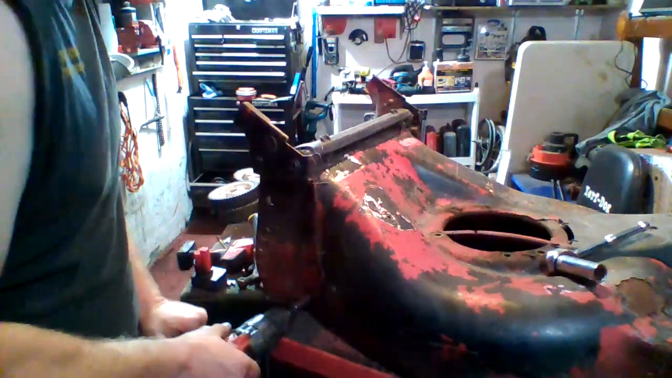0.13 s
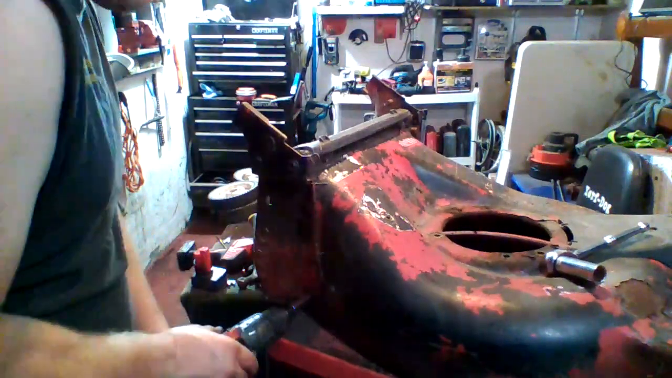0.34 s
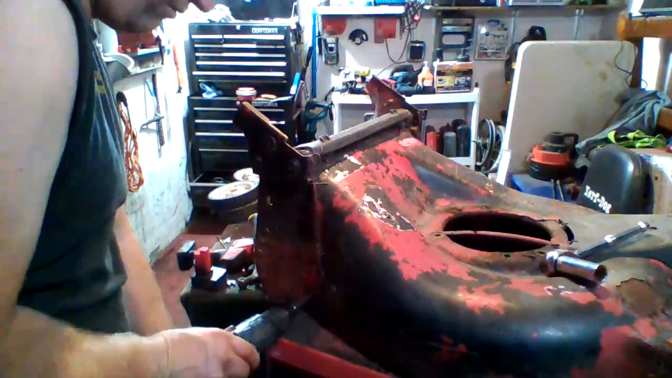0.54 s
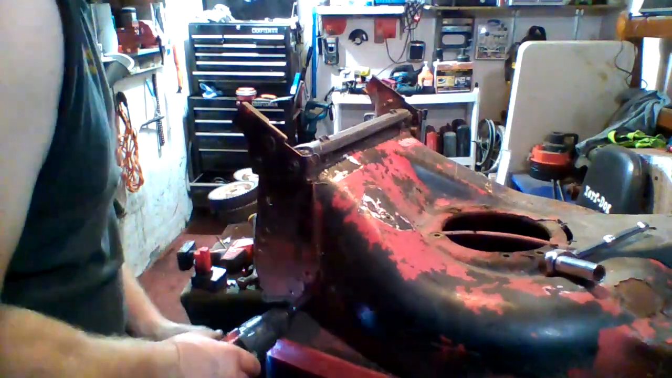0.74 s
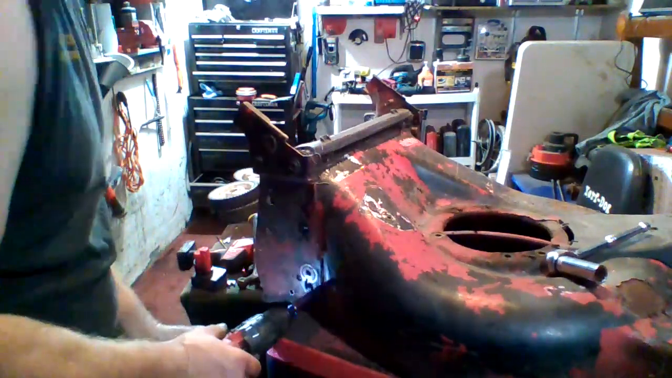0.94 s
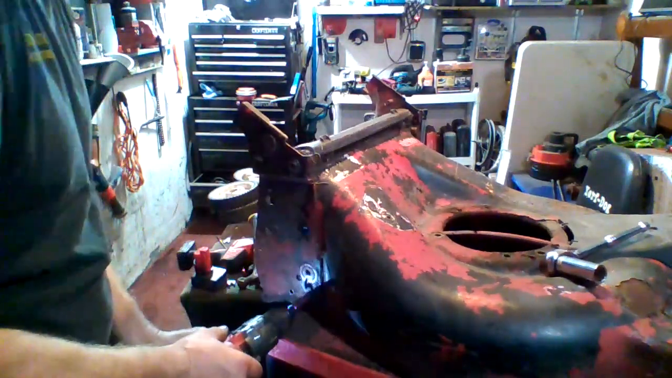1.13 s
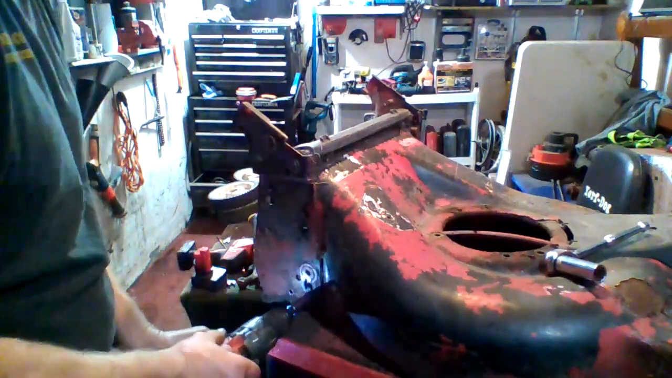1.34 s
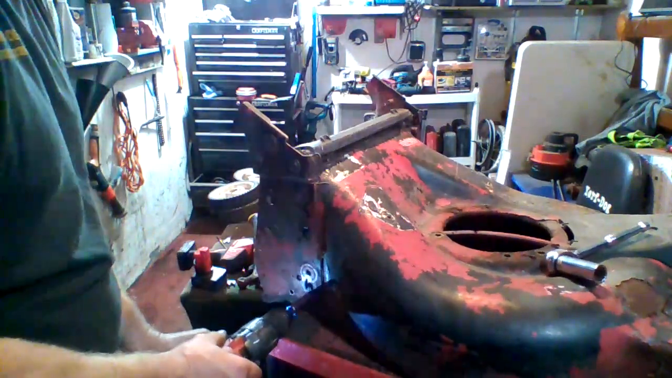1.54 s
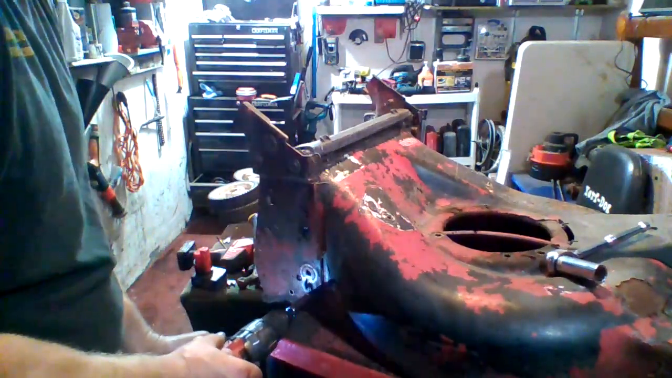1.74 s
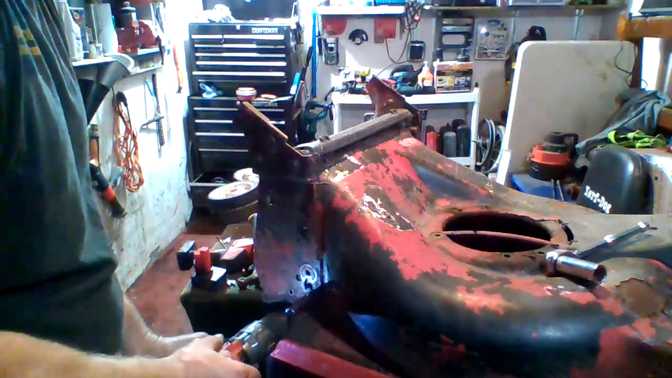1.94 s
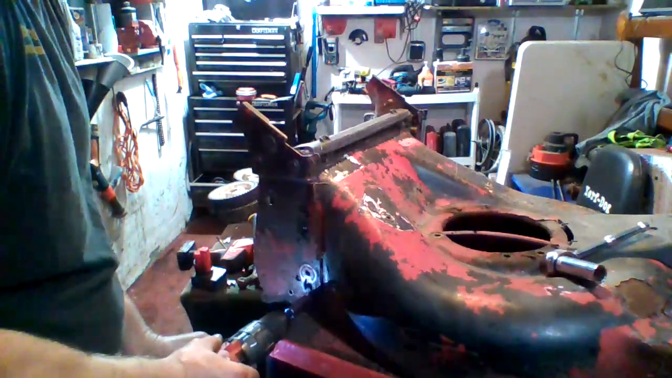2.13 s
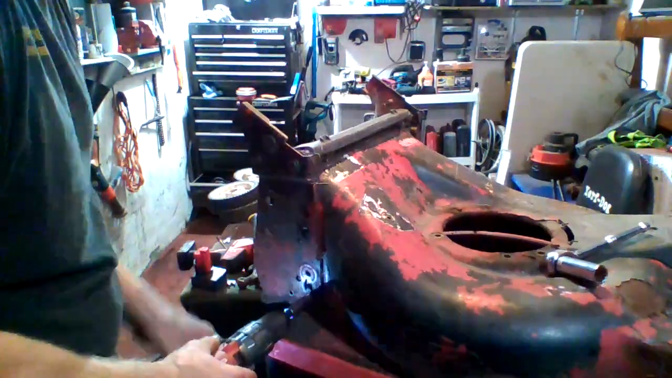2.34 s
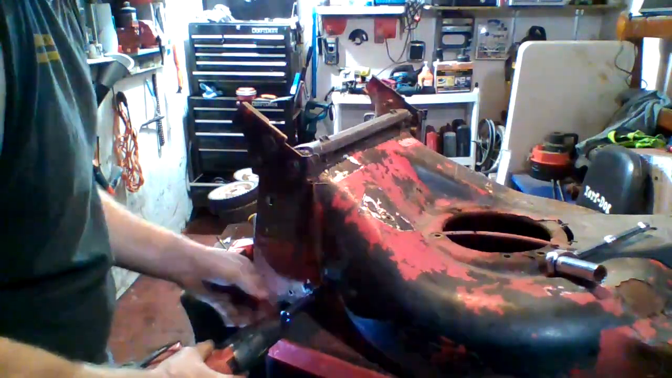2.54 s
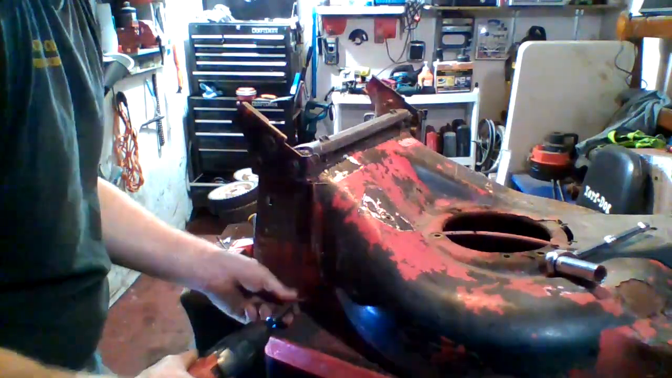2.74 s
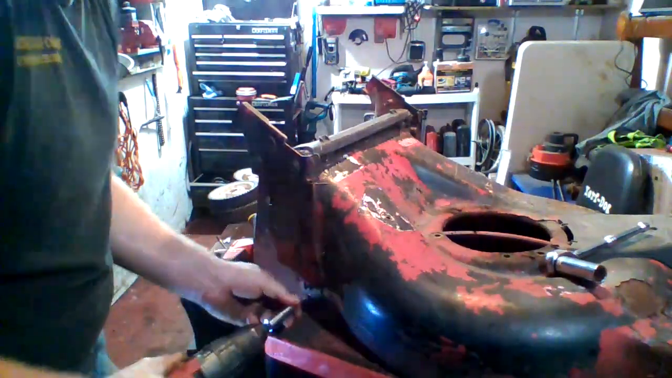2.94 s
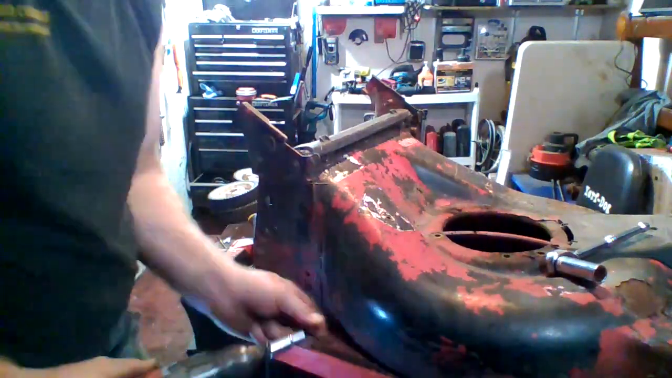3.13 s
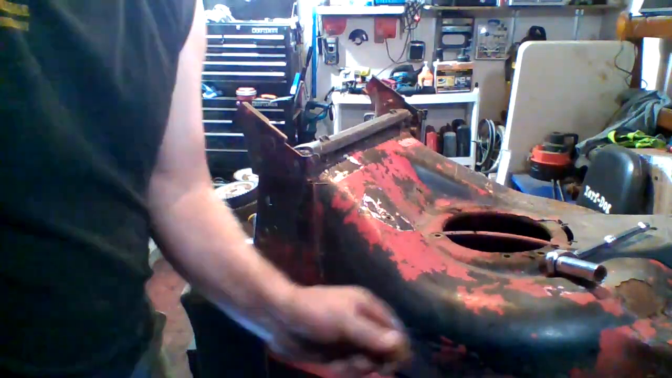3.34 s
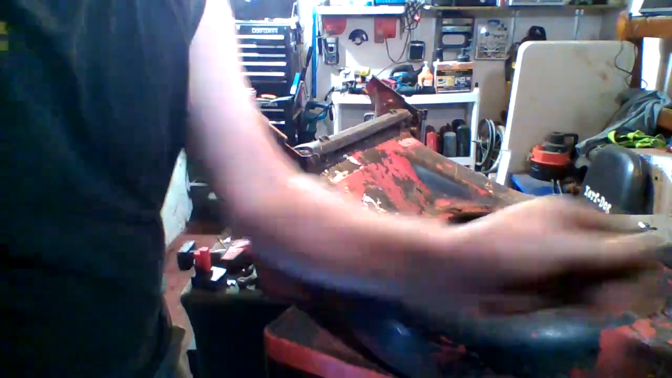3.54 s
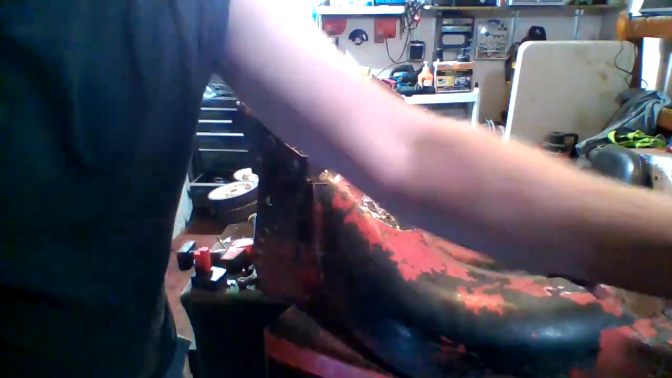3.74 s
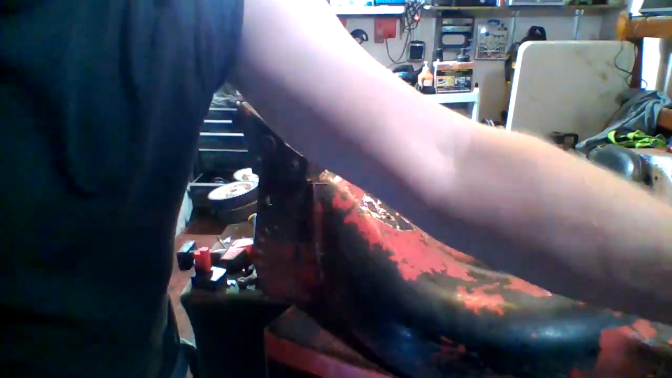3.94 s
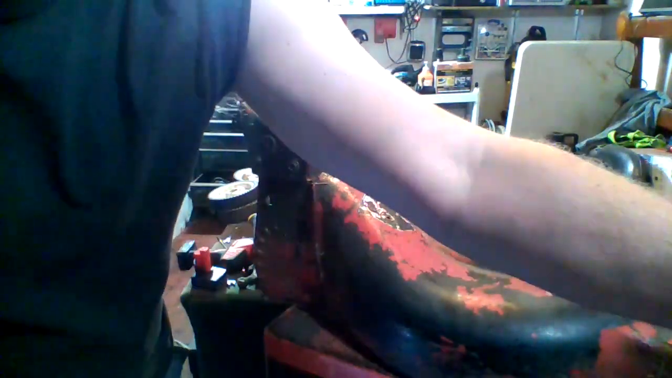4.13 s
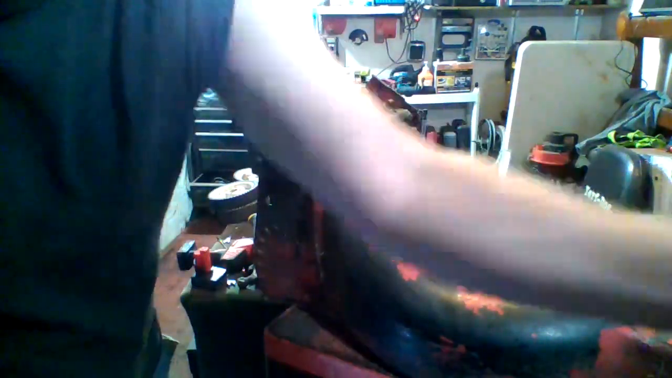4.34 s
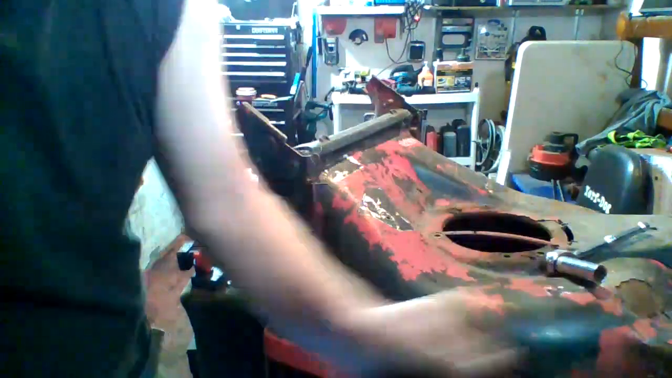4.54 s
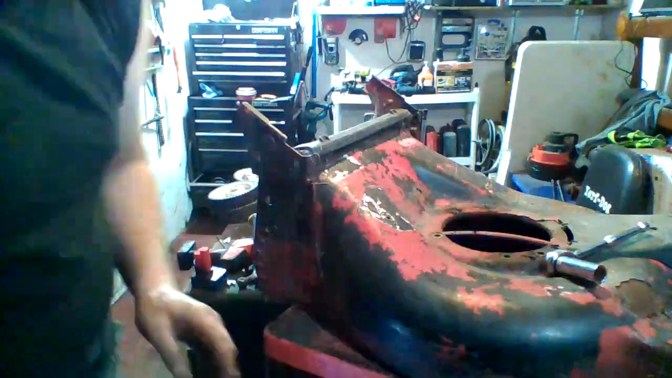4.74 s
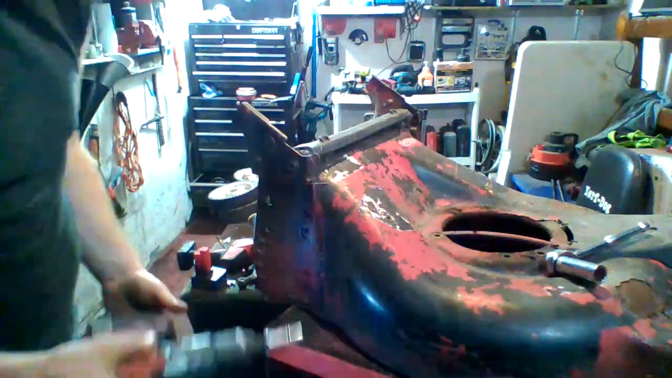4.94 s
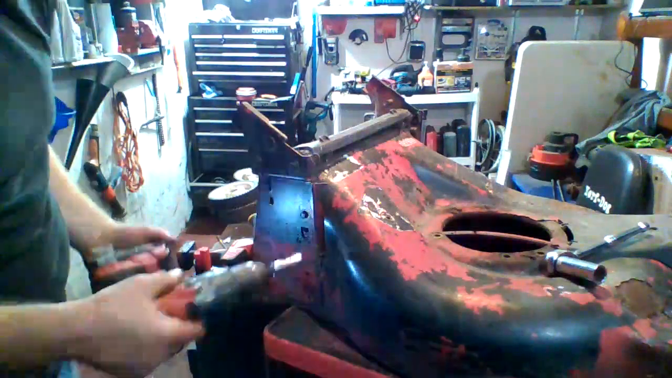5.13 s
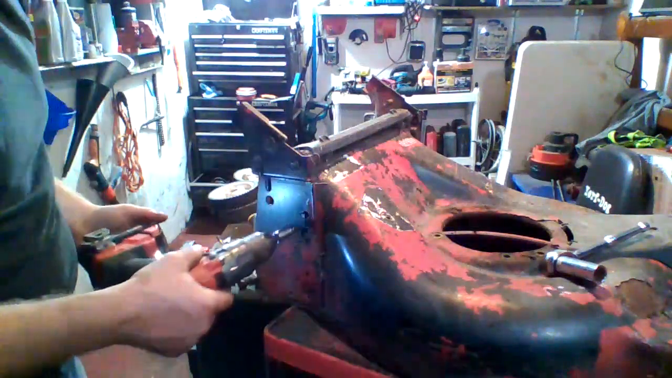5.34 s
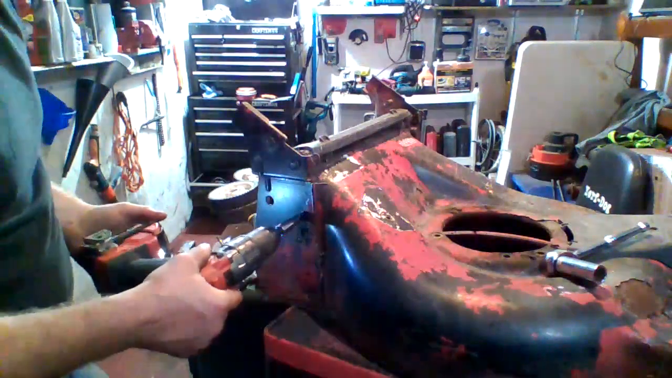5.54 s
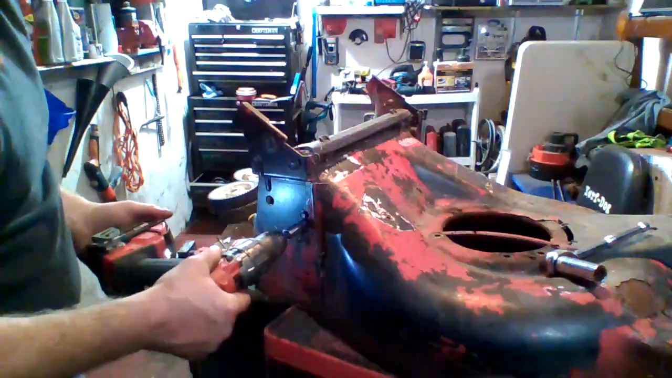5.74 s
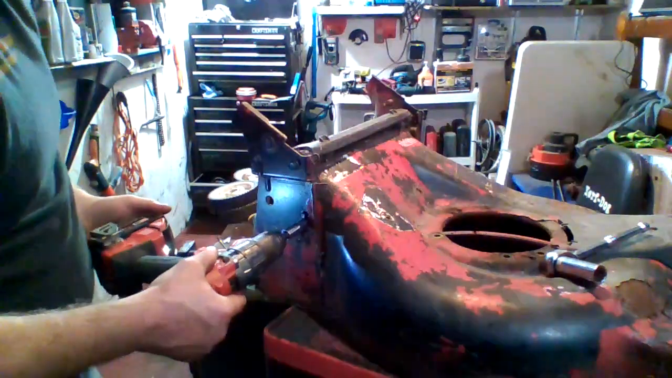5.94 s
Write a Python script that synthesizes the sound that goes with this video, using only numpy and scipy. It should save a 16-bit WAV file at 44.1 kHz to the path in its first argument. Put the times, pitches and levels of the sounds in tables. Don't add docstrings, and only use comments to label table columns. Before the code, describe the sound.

A small garage with a short reverberant tail, heard close in stereo over low rumble, faint hum and hiss. From 0 to 0.6 s hands rub and a metal bit ticks; a socket seats with a clack at 0.3 s, and two sharp cracks come at about 0.6 s, the second very loud. Quiet rubbing follows. At 1.25 s a cordless driver groans up, slams at 1.3 s with a very loud metallic clack, then holds a bright, steady whine with gritty gear hiss and deck vibration, rising slightly at 1.54 s as the bolt frees. It sags from 2.35 s and brakes to silence by 2.5 s. Small ticks and finger rubs run from 2.75 to 3.4 s. The bolt clunks onto the bench at 4.03 s, again at 4.23 s, bouncing and tipping. Cloth swishes at 4.65 s, grip scuffs and faint squeaks follow, and dull plate thumps cluster around 5.75 s.

```python
import sys
import numpy as np
from scipy import signal
from scipy.fft import rfft, irfft
from scipy.io import wavfile
from scipy.ndimage import uniform_filter1d, minimum_filter1d

SR = 44100
rng = np.random.default_rng(int(sys.argv[2]) if len(sys.argv) > 2 else 0)


def makeup_ratio(level_db):
    decades = np.asarray(level_db, float) / 20
    return 10 ** decades


def store_pcm(level_fs):
    pcm = np.round(np.clip(level_fs, -1, 1) * 32767).astype(np.int16)
    wavfile.write(sys.argv[1], SR, np.atleast_2d(pcm).T)


N = 268569
RUN = 3 * SR

TRIGGER_S, FREED_S, LET_GO_S, BRAKE_S = 1.242, 1.54, 2.335, 2.388
TIGHT_HZ, FREE_HZ = 447, 472.8
AIM_HZ, SPIN_UP_HZ_PER_S, SETTLE_S, LOOSEN_S = 452, 3300, .033, .145
BIND_S, BIND_HZ, BIND_WIDTH_S = 1.635, 2, .025
COAST_HZ_PER_S2, BRAKE_HZ_PER_S, BRAKE_HZ_PER_S2 = 3600, 3100, 8000
ENGAGE_S, BRAKE_FADE_DB_PER_S = 1.334, 300

# (multiple of shaft speed [1], left-right [dB], left lead [rad],
# left-right under grip [dB], left lead under grip [rad])
MAIN_ORDERS = [(4, .3, 0, 1, .2), (8, 2.7, 1.7, -8, .8), (10.205, 4, 1, 4, 1), (13, 3.5, .2, 0, -2)]
# (rms at free speed [dB], slope [dB per octave of speed], gain under load [dB],
# change by coasting [dB], rms as the brake bites [dB])
ORDER_LEVELS = [(-22, 45, -4, -14, -23), (-12.5, 10, -5, -13, -20.5), (-39, 45, 14.5, -5, -45),
                (-21, 25, -1, -5, -26)]
WEAK_ORDERS = [1, 16, 26, 32, 3.04, 6.29, 9, 29]
# (rms at full drive [dB], left-right [dB], wavering [dB])
WEAK_LEVELS = [(-37, -2, 3), (-44, 0.5, 6.5), (-35, 16.5, 4), (-40, 1.5, 4), (-43, 0, 3), (-44, 0, 3),
               (-45, 0, 3), (-42, 0, 3)]
# (frequency [Hz], width [Hz], gain [dB])
PATH = [(1815, 11, -13), (1842, 11, -14), (1874, 8, -4), (2330, 120, 0), (2920, 90, 11.5), (3592, 12, 5),
        (3660, 22, -3.5), (3710, 7, -20), (3730, 9, -5), (4770, 35, -10), (5815, 35, -14), (6040, 40, -2),
        (6102, 18, -13)]
# (time [s], level [dB])
SWITCHING = [(1.248, -38), (1.28, -35), (1.305, -38)]

HISS_DB, HISS_FULL_S, HISS_RISE_DB_PER_S = -25, 1.3046, 330
HISS_STOP_S, HISS_FALL_DB_PER_S = 2.4523, 520
SLACK_DB = -9
FIZZ_HZ, FIZZ_LOADED_DB, FIZZ_FREE_DB = 7500, 3, -1.7
DECK_DB, JOLT_RISE_S = -38, 0.03
# (frequency [Hz], density [dB per Hz])
GEAR_COLOUR = [(120, -50.5), (400, -25.5), (800, -18.5), (1500, -18.5), (2400, -19.5), (3000, -15),
               (4300, -17.5), (6200, -16.5), (7200, -17.5), (10000, -19.5), (12000, -16), (14000, -12),
               (16000, -20.5)]
# (frequency [Hz], difference [dB])
GEAR_BALANCE = [(300, -2), (1000, .5), (4000, 0.5), (8000, 3), (15000, 0.95)]
# (frequency [Hz], coherence [1])
NEAR_COHERENCE = [(60, 1.0), (150, 1.0), (380, 1.0), (950, 0.84), (2380, 0.33), (5980, 0.12), (15000, 0.2)]
# (frequency [Hz], width [Hz], gain [dB])
DECK_MODES = [(224, 62, -2.5), (278, 42, -3), (616, 60, -12)]
# (time [s], level [dB], time to fall 20 dB [s])
JOLTS = [
    (1.305, -17.5, 0.05),
    (1.33, -29, .15),
    (1.543, -31.5, 0.1),
    (1.773, -32.5, 0.3),
    (1.9, -31.5, 1.6),
    (2.49, -39.5, -0.5),
]
# (frequency [Hz], width [Hz], gain [dB])
STAND_MODES = [(35, 30, 2), (60, 20, 4)]
# (time [s], level [dB])
STAND_LEVEL = [(1.28, -61), (1.34, -32), (1.45, -47), (2.3, -46), (2.55, -53), (2.68, -56)]
# (frequency [Hz], width [Hz], gain [dB])
HOUSING_MODES = [(2330, 350, -3.5), (2893, 540, 1), (3600, 540, -1.5)]
# (time [s], level [dB])
GROAN_LEVEL = [(1.256, -52), (1.26, -32.5), (1.3, -19.5), (1.335, -21), (1.36, -45),
               (2.43, -45), (2.455, -28), (2.475, -45)]

# (time [s], peak level [dB], ring over crack [dB])
SLAM = [
    (1.2585, -25, -6),
    (1.3046, 3, -12),
]
ANVIL = [
    (1.306, -13, 18),
]
BIT_CLICKS = [(0.14, -36, -3), (0.243, -40, -3), (0.3706, -34.5, -3.5), (0.3915, -30, -3),
              (0.4104, -29, -5), (0.4805, -24.5, -9), (0.5584, -29.5, -0.5), (0.589, -13, -3),
              (0.6259, -2, 1), (1.2062, -32, -2), (2.645, -41, -3), (5.1507, -34, -12.5)]
SEAT = [
    (0.3044, -6.5, 3),
]
BOLT_LANDS = [
    (4.028, -11.5, 11),
    (4.037, -30, 2),
    (4.047, -33, 0),
]
BOLT_BOUNCES = [
    (4.2258, -13, 11),
    (4.2395, -25, 4),
    (4.254, -34, 3),
    (4.268, -33, 3),
    (4.2915, -20, 11),
    (4.297, -30, 3),
]
BOOMS = [
    (4.03, -38, 12),
    (4.31, -46, 12),
]
THUMPS = [(0.058, -43, 8), (0.309, -32, 4.2), (0.72, -43, 8), (0.954, -41, 12), (1.02, -50.5, 14),
          (1.289, -27, 4.2), (1.306, -18, 9.6), (2.58, -41, 8.8), (4.032, -32, 0), (5.743, -28, 2.7),
          (5.765, -25, 6), (5.799, -31.5, 8), (5.83, -35, 14), (5.87, -39, 15), (5.911, -37, 16),
          (5.95, -43, 13)]
# (time [s], peak level [dB], pitch [Hz])
TAPS = [(0.139, -46, 570), (0.534, -38.5, 1133), (0.691, -42.5, 580), (0.82, -47.5, 2270),
        (0.943, -44.5, 791), (2.747, -47, 1315), (2.805, -33.5, 1980), (2.815, -42, 1900),
        (2.868, -47, 2600), (3.008, -42, 600), (3.03, -42, 2000), (3.04, -44, 650), (3.089, -45, 820),
        (3.19, -47, 2100), (3.382, -44, 783), (3.402, -41, 1200), (3.415, -45, 1700), (4.108, -43, 605),
        (4.16, -46, 650), (5.079, -42, 2140), (5.745, -29, 1600)]

# (frequency [Hz], level [dB], t60 [s])
ANVIL_RING = [(2160, 0, .07), (2900, -8, .06)]
BIT_RING = [(3520, -7.5, 0.011), (8500, -5.5, .01), (12100, -6, 0.015), (13100, 5, .012),
            (14500, 2.5, .012)]
SOCKET_RING = [(1100, -14, .025), (1350, -12, .02), (2100, -4, .018), (2260, -1, .022), (3920, -8, .015),
               (4970, -7, .015), (12000, -6, .015)]
BOLT_LANDS_RING = [(340, 0, .06), (517, 2, .03), (567, 14, 0.027), (820, -8, .03), (1120, -2.5, 0.019),
                   (1400, -7.5, 0.056), (1680, -8, 0.025), (2200, -9, 0.02)]
BOLT_BOUNCES_RING = [(330, -2, .04), (496, -1, 0.032), (578, 11, 0.02), (789, -4, .03), (1086, 4, 0.018),
                     (1273, -9, 0.028), (1744, -9, 0.029), (2124, -14, 0.029), (3020, -18, 0.017)]
BENCH_RING = [(48, 0, .4), (75, -3, .3), (120, -5, .25)]
PLATE_RING = [(220, -5.5, 0.43), (279, 4, .15), (310, 0, 0.08), (550, -12, .05), (860, -12, 0.041)]

# (frequency [Hz], density [dB per Hz])
SLAM_CRACK = [(1200, -30), (2500, -12), (4000, -14), (7000, -5), (12000, -5), (15500, 2)]
BIT_CRACK = [(1500, -43), (2700, -21), (3300, -9.5), (6800, -4.5), (10000, -5.5), (13500, -6),
             (15600, -1.5)]
SEAT_CRACK = [(240, -53), (400, -16.5), (1710, -21.5), (2030, -4.5), (2630, -16.5), (5000, -10.5),
              (8160, -15), (12000, -10), (15500, -13)]
BENCH_CRACK = [(150, -50.5), (250, -15), (593, -3.5), (962, -16), (1670, -17), (1920, -23), (4250, -25),
               (13100, -26.5), (15500, -39)]
BOUNCE_CRACK = [(200, -30), (593, -3.5), (1200, -14), (2500, -18), (3500, -24), (5500, -32), (13100, -36),
                (15500, -45)]
PLATE_CRACK = [(120, -33), (280, -0.5), (600, -2), (900, -6.5), (1800, -13), (3500, -32.5)]
TAP_CRACK = [(300, -23), (700, -4), (2300, 0), (4000, -18), (15000, -30)]

# (peak time [s], time to rise 20 dB [s], time to fall 20 dB [s],
# dull rub level [dB], bright rub level [dB])
RUBS = [(0.0, .01, .07, -58, -50), (.086, 0.1, 0.2, -60.5, -66), (.184, .08, 0.3, -57.5, -53),
        (.385, 0.08, 0.14, -62, -45), (.53, .06, .05, -55, -58), (.66, .03, 0.06, -46, -45.5),
        (.94, 0.25, 0.2, -57.5, -52), (1.206, .014, .05, -53, -51.5), (2.75, 0.05, 0.08, -55, -61),
        (2.808, 0.02, 0.08, -52, -56), (3.022, 0.14, 0.18, -46, -44), (3.3, 0.7, 0.2, -59.5, -55),
        (3.405, 0.06, 0.08, -50.5, -53.5), (3.47, 0.07, .4, -59, -51.5), (4.035, 0.03, 0.08, -54, -55),
        (4.54, .08, .2, -75, -49), (4.655, 0.06, 0.2, -56, -40), (4.72, .06, .15, -65, -46),
        (5.01, 0.12, 0.1, -57, -62), (5.082, 0.012, 0.06, -51, -50.5), (5.154, 0.03, .025, -49, -64),
        (5.215, 0.08, 0.06, -54, -58.5), (5.4, 0.2, .4, -62, -53), (5.574, 0.14, .08, -54, -48),
        (5.778, .07, 0.085, -42, -39)]
# (frequency [Hz], density [dB per Hz])
PALM_COLOUR = [(250, -34.5), (600, -2.5), (2200, -1.0), (4000, -6.5), (7000, -18.5)]
CLOTH_COLOUR = [(2500, -22.5), (5000, -13), (7000, -10), (9000, -8), (13500, 3.5), (16000, -2)]
# (peak time [s], time to rise 20 dB [s], time to fall 20 dB [s], level [dB])
SCUFFS = [
    (3.02, .1, .1, -58),
    (4.65, .02, .14, -55),
    (5.01, .08, .06, -58),
    (5.205, .07, .06, -51),
    (5.228, .05, .05, -52),
    (5.545, .08, .06, -52),
    (5.575, .08, .07, -51),
]
# (frequency [Hz], density [dB per Hz])
SCUFF_COLOUR = [(700, -25), (1300, -6), (2300, 0), (3800, -4), (5500, -16), (9000, -28)]
# (time [s], length [s], start pitch [Hz], end pitch [Hz], rms level [dB])
SQUEAKS = [
    (2.89, .09, 12900, 13900, -61),
    (5.34, .07, 13050, 13950, -58),
    (5.435, .025, 14100, 13200, -56),
    (5.465, .065, 13800, 12500, -61),
    (5.705, .06, 13600, 14500, -61),
    (5.905, .075, 15100, 13200, -63),
]

AIR_DB, MIC_DB = -50.5, -55.8
# (frequency [Hz], density [dB per Hz])
AIR_COLOUR = [(15, -3), (44, -7), (62, -7.5), (85, -16.5), (118, -17.5), (155, -26.5), (350, -22),
              (780, -36.5), (1500, -36), (5500, -41), (9000, -44), (15600, -50.5)]
MIC_COLOUR = [(4000, -22), (7000, -11), (10000, -7), (12200, -5), (12900, 0), (15700, -1)]
# (frequency [Hz], coherence [1])
AIR_COHERENCE = [(60, 0.98), (180, 0.93), (550, 0.97), (1650, 0.61), (4970, 0.23), (15000, 1)]
# (frequency [Hz], rms level [dB])
HUM = [(60, -64), (118, -65.5), (414, -70.5), (826, -76.5)]
# (frequency [Hz], t60 [s])
GARAGE_T60 = [(150, 0.29), (500, 0.15), (2000, 0.18), (6000, 0.17), (15000, 0.059)]

PORTS = np.array([[1], [-1]])


def evened(x):
    return x / np.sqrt(np.mean(x ** 2) + 1e-20)


def read(points, hz):
    f, value = np.transpose(points)
    return np.interp(np.log(hz + 1), np.log(f + 1), value)


def curves(rows, off=-120, count=RUN):
    s, *columns = np.transpose(rows)
    t = np.arange(count) / SR
    return [np.interp(t, s, column, left=off, right=off) for column in columns]


def since(s):
    return np.maximum(np.arange(RUN) / SR - s, 0)


def until(s):
    return np.maximum(s - np.arange(RUN) / SR, 0)


def wander(hz, count=RUN):
    pole = [1, -np.exp(-2 * np.pi * hz / SR)]
    once = signal.lfilter([1], pole, rng.standard_normal(count))
    return evened(signal.lfilter([1], pole, once))


def stroke(t, s, rise_s, fall_s):
    return -20 * np.maximum((s - t) / rise_s, (t - s) / fall_s)


def ports(db):
    return makeup_ratio(PORTS * db / 2)


def late(hz, lead_s):
    return 2 * np.pi * hz * lead_s * np.exp(-(hz / 5000) ** 2)


def hiss(colour, same, patchy_db, balance=((1, 0), (2, 0)), size=512, count=N):
    hz = np.fft.rfftfreq(size, 1 / SR)[:, None]
    draws = rng.standard_normal((count * 2 // size + 3, len(hz), 5), dtype=np.float32)
    a, b, c, d, patches = draws.T
    patches = uniform_filter1d(patches, size=8, axis=0)
    patches = evened(uniform_filter1d(patches, size=4, axis=1))
    like = np.clip(read(same, hz), 0, .99)
    left = a + 1j * b
    shared = np.exp(-1j * late(hz, 2 / SR)) * like * left
    right = (shared + np.sqrt(1 - like ** 2) * (c + 1j * d)) / makeup_ratio(read(balance, hz))
    z = np.array([left, right]) * makeup_ratio(read(colour, hz) + patchy_db * patches)
    return evened(signal.istft(z, window="cosine", nperseg=size)[1][:, :count])


def resonate(x, modes):
    return sum(makeup_ratio(db) * signal.lfilter(*signal.iirpeak(hz, hz / width, SR), x) for hz, width, db in modes)


def shaken(modes, unlike):
    force = rng.standard_normal(RUN) + unlike * rng.standard_normal((2, RUN))
    return evened(resonate(resonate(force, modes), modes))


def load():
    return np.exp(-since(FREED_S) / LOOSEN_S)


def shaft():
    knee_s = TRIGGER_S + AIM_HZ / SPIN_UP_HZ_PER_S - SETTLE_S
    steady_s = np.minimum(since(TRIGGER_S), knee_s - TRIGGER_S)
    settling_s = SETTLE_S * (1 - np.exp(-since(knee_s) / SETTLE_S))
    pull = SPIN_UP_HZ_PER_S * (steady_s + settling_s)
    freed = (FREE_HZ - TIGHT_HZ) * (1 - load())
    bind = BIND_HZ * np.exp(-((since(BIND_S) + until(BIND_S)) / BIND_WIDTH_S) ** 2)
    coast = COAST_HZ_PER_S2 * np.minimum(since(LET_GO_S), BRAKE_S - LET_GO_S) ** 2
    braking = BRAKE_HZ_PER_S * since(BRAKE_S) + BRAKE_HZ_PER_S2 * since(BRAKE_S) ** 2
    return np.maximum(np.minimum(pull, TIGHT_HZ) + freed - bind - coast - braking, 0)


def order_db(k, speed, free_db, per_octave_db, load_db, coast_db, brake_db):
    coasting = np.minimum(since(LET_GO_S) / (BRAKE_S - LET_GO_S), 1)
    driven = free_db + per_octave_db * np.log2(speed / FREE_HZ + 1e-3)
    driven += load_db * load() + coast_db * coasting
    driven -= 900 * (since(BRAKE_S) + until(ENGAGE_S))
    braked = brake_db - BRAKE_FADE_DB_PER_S * since(BRAKE_S + 0.012)
    braked -= 500 * since(BRAKE_S + .038) + 250 * until(BRAKE_S + .012)
    grid = np.arange(7000.)
    path = sum(db * np.exp(-.5 * ((grid - hz) / width) ** 2) for hz, width, db in PATH)
    return (1 - .6 * coasting) * np.interp(k * speed, grid, path) + np.maximum(driven, braked)


def whine():
    speed = shaft() * (1 + .0004 * wander(25))
    turn = 2 * np.pi * np.cumsum(speed) / SR
    grip = np.clip(3 * load() - .6, 0, 1)
    out = np.zeros((2, RUN))
    for (k, left_db, lead, held_db, held_lead), levels in zip(MAIN_ORDERS, ORDER_LEVELS):
        side_db = PORTS * (left_db + (held_db - left_db) * grip) / 2
        side_phase = PORTS * (lead + (held_lead - lead) * grip) / 2
        level_db = order_db(k, speed, *levels) + 1.2 * wander(70)
        out += makeup_ratio(level_db + side_db) * np.sin(k * turn + side_phase)
    drive_db = -340 * until(1.425) - 315 * since(2.385)
    for k, (db, left_db, waver_db) in zip(WEAK_ORDERS, WEAK_LEVELS):
        out += makeup_ratio(db + drive_db + waver_db * wander(22)) * ports(left_db) * np.sin(k * turn)
    switching = np.sin(2 * np.pi * 8150 * np.arange(RUN) / SR) * np.cos(2.6 * turn)
    out += makeup_ratio(curves(SWITCHING)[0]) * switching
    return np.sqrt(2) * out


def hiss_level():
    slack = SLACK_DB * (until(HISS_FULL_S) > 0)
    rise = HISS_RISE_DB_PER_S * until(HISS_FULL_S)
    return HISS_DB + slack - rise - HISS_FALL_DB_PER_S * since(HISS_STOP_S)


def gear_hiss():
    turn = 2 * np.pi * np.cumsum(shaft()) / SR
    rough = makeup_ratio(1.5 * wander(260) + 0.37 * wander(30)) * (1 + 0.084 * np.cos(turn))
    teeth = rough * hiss(GEAR_COLOUR, NEAR_COHERENCE, 1.7, GEAR_BALANCE, count=RUN)
    body = signal.oaconvolve(teeth, signal.firwin(101, FIZZ_HZ, fs=SR)[None], "same")
    fizz_db = FIZZ_FREE_DB + (FIZZ_LOADED_DB - FIZZ_FREE_DB) * load() + .7 * wander(18)
    return makeup_ratio(hiss_level() + 9.5) * (body + makeup_ratio(fizz_db) * (teeth - body))


def housing_groan():
    return makeup_ratio(curves(GROAN_LEVEL)[0]) * shaken(HOUSING_MODES, 1 / 4.5)


def deck():
    jolts = [db - 20 * until(s) / JOLT_RISE_S - 20 * since(s) / fall_s for s, db, fall_s in JOLTS]
    jolt_db = np.max(jolts, axis=0) - 110 * since(HISS_STOP_S) - 300 * since(2.63)
    level_db = np.maximum(hiss_level() - HISS_DB + DECK_DB, jolt_db)
    return makeup_ratio(level_db - .7) * shaken(DECK_MODES, 0.14)


def stand():
    return makeup_ratio(curves(STAND_LEVEL)[0] + .5) * shaken(STAND_MODES, .25)


def strikes(rows, modes, colour, crack_s, rattle_db, left_db, lead_s):
    out = np.zeros((2, N + 20000))
    t = np.arange(6144) / SR
    hz = np.fft.rfftfreq(len(t), 1 / SR)
    like = np.clip(read(NEAR_COHERENCE, hz) + .5, 0, 1)
    for s, db, ring_db in rows:
        ring = np.zeros((2, len(t)))
        for f, mode_db, t60 in modes:
            decay = makeup_ratio(mode_db + 2 * rng.standard_normal() - 60 * t / t60) * np.minimum(f * t, 1)
            ring += decay * np.sin(2 * np.pi * f * t + [[late(f, lead_s)], [0]])
        a, b = rfft(rng.standard_normal((len(t), 2)).T)
        right = like * a * np.exp(-1j * late(hz, lead_s)) + np.sqrt(1 - like ** 2) * b
        crack = irfft(makeup_ratio(read(colour, hz)) * np.array([a, right]))
        crack *= makeup_ratio(-60 * t / crack_s) + makeup_ratio(rattle_db - 60 * t / 0.16)
        blow = crack / abs(crack).max() + makeup_ratio(ring_db) * ring / abs(ring).max()
        at = round(s * SR)
        out[:, at:at + len(t)] += makeup_ratio(db) * blow / abs(blow).max() * np.minimum(t / .0003, 1)
    return out[:, :N] * ports(left_db)


def slack_slam():
    slam = strikes(SLAM, SOCKET_RING, SLAM_CRACK, .014, -20, 1, 4e-5)
    return slam + strikes(ANVIL, ANVIL_RING, SLAM_CRACK, .014, -20, 1, 4e-5)


def bit_and_socket():
    clicks = strikes(BIT_CLICKS, BIT_RING, BIT_CRACK, 0.016, -11, 1.2, 4e-5)
    return clicks + strikes(SEAT, SOCKET_RING, SEAT_CRACK, .015, -14, 1.1, 4e-5)


def bolt_on_bench():
    lands = strikes(BOLT_LANDS, BOLT_LANDS_RING, BENCH_CRACK, 0.064, -21.5, 0.66, -0.00016)
    bounces = strikes(BOLT_BOUNCES, BOLT_BOUNCES_RING, BOUNCE_CRACK, 0.045, -18, .9, -9e-5)
    return lands + bounces + strikes(BOOMS, BENCH_RING, PLATE_CRACK, .05, -30, .1, 4e-5)


def plate_thumps():
    return strikes(THUMPS, PLATE_RING, PLATE_CRACK, 0.12, -16.5, 0.013, 4e-5)


def taps():
    out = np.zeros((2, N))
    for s, db, hz in TAPS:
        modes = [(hz, 0, .03), (2 * hz, -14, .015)]
        out += strikes([(s, db, 1.5)], modes, TAP_CRACK, .02, -22.5, .4, 4e-5)
    return out


def hands():
    t = np.arange(0, N, 32) / SR
    strokes = [np.array([[dull], [bright]]) + stroke(t, s, rise_s, fall_s)
               for s, rise_s, fall_s, dull, bright in RUBS]
    dull_db, bright_db = curves(np.vstack([t, np.max(strokes, axis=0)]).T, count=N)
    grain = makeup_ratio(1.3 * wander(150, count=N))
    palms = makeup_ratio(dull_db + 0.05) * hiss(PALM_COLOUR, NEAR_COHERENCE, 2.2)
    cloth = makeup_ratio(bright_db + 1.0) * hiss(CLOTH_COLOUR, NEAR_COHERENCE, 3.1)
    return grain * (palms + cloth)


def scuffs():
    t = np.arange(N) / SR
    level_db = np.max([db + stroke(t, s, rise_s, fall_s) for s, rise_s, fall_s, db in SCUFFS], axis=0)
    ticks = makeup_ratio(3.5 * wander(400, count=N))
    return makeup_ratio(level_db) * evened(ticks * hiss(SCUFF_COLOUR, NEAR_COHERENCE, 1.5))


def squeaks():
    out = np.zeros(N)
    for s, length, from_hz, to_hz, db in SQUEAKS:
        u = np.arange(0, 1, 1 / (length * SR))
        jitter = uniform_filter1d(rng.standard_normal(4410), size=60)[:len(u)]
        hz = from_hz + (to_hz - from_hz) * u + 900 * jitter
        whistle = np.sqrt(np.sin(np.pi * u)) * np.sin(2 * np.pi * np.cumsum(hz) / SR)
        out[round(s * SR):][:len(u)] += makeup_ratio(db + 3.5) * whistle
    return out


def garage(x):
    echoes = np.zeros((2, SR // 2))
    at = np.arange(200, SR // 2 - 20, 20) + rng.integers(0, 20, (2, (SR // 2 - 201) // 20))
    np.put_along_axis(echoes, at, rng.choice([-1., 1.], at.shape), 1)
    hz, t, z = signal.stft(echoes, SR, nperseg=512)
    like = np.clip(read(NEAR_COHERENCE, hz), 0, 1)[:, None]
    z[1] = like * z[0] + np.sqrt(1 - like ** 2) * z[1]
    decay = makeup_ratio(-60 * t / read(GARAGE_T60, hz)[:, None])
    tail = signal.istft(z * decay, SR, nperseg=512)[1]
    return signal.fftconvolve(x, tail / np.linalg.norm(tail[0]), axes=1)[:, :N]


def air():
    t = np.arange(N) / SR
    hum = sum(makeup_ratio(db + 3.0 + 0.98 * wander(1.8, count=N)) * np.sin(2 * np.pi * hz * t) for hz, db in HUM)
    rumble = makeup_ratio(AIR_DB) * hiss(AIR_COLOUR, AIR_COHERENCE, 0.67, size=2048)
    return rumble + makeup_ratio(MIC_DB) * hiss(MIC_COLOUR, AIR_COHERENCE, 1.1) + hum


def scene():
    tone, noise = whine(), gear_hiss() + deck() + stand() + housing_groan()
    tone, noise = np.pad([tone, noise], ((0, 0), (0, 0), (0, N - RUN)))
    blows = slack_slam() + bit_and_socket() + bolt_on_bench() + plate_thumps() + taps()
    wet = makeup_ratio(-13) * blows + makeup_ratio(-31) * tone + makeup_ratio(-9) * noise
    return tone + noise + blows + garage(wet) + hands() + scuffs() + squeaks() + air()


def thinned(x, under_db, low_hz, side_hz, side_share, side_db):
    mid_diff = np.array([x[0] + x[1], x[0] - x[1]]) / 2
    hz, t, z = signal.stft(mid_diff, SR, window="cosine", nperseg=1024)
    hz = hz[:512:8, None]
    power = (abs(z[:, :512].reshape(2, 64, 8, -1)) ** 2).mean(2)
    mid_db, diff_db = 10 * np.log10(uniform_filter1d(power, size=2, axis=2) + 1e-20)

    def around(db):
        return uniform_filter1d(np.where(hz < 15300, db, db[40]), size=21, axis=0)

    dip_db = mid_db - around(mid_db)
    dip_db -= uniform_filter1d(dip_db, size=41, axis=1)
    overall_db = mid_db[5:40].mean(0)
    loud = overall_db > np.percentile(overall_db, 81)
    mid = (dip_db > -under_db * np.where(hz > 11000, 1.3, 1)) | (hz < low_hz) | (hz > 15000)
    mid |= ~loud & ((hz < 7600) | (dip_db > -1.7 * under_db))
    weak = diff_db < np.percentile(diff_db, side_share, axis=1)[:, None]
    thin = (diff_db < around(diff_db) - side_db + (hz - side_hz) / 4000) | (hz > 15300)
    masked_low = (abs(hz - 400) < 100) & (diff_db < mid_db - 19)
    masked_high = (abs(hz - 2000) < 800) & (diff_db < mid_db - 6.5)
    masked = loud & (masked_low | masked_high)
    diff = ~((hz > side_hz) & (weak | thin) | masked)
    kept = minimum_filter1d(1. * np.array([mid, diff & mid]), size=2, axis=2)
    gap_edge = mid & ~np.roll(mid, 1, axis=0) & (hz > 7600)
    kept[:, 1:] *= ~gap_edge[1:]
    z[:, :512] *= np.repeat(np.maximum(kept, .003), 8, axis=1)
    mid, diff = signal.istft(z, SR, window="cosine", nperseg=1024)[1][:, :N]
    return np.array([mid + diff, mid - diff])


def band_limit(x):
    return signal.sosfilt(signal.butter(12, 15670, fs=SR, output="sos"), x)


def record(dry):
    clipped = np.clip(dry, -1, 1)
    mix = thinned(clipped, under_db=3.35, low_hz=6200, side_hz=6800, side_share=52, side_db=4.7)
    return band_limit(mix)


dry = scene()
out = record(dry)
store_pcm(out)
```